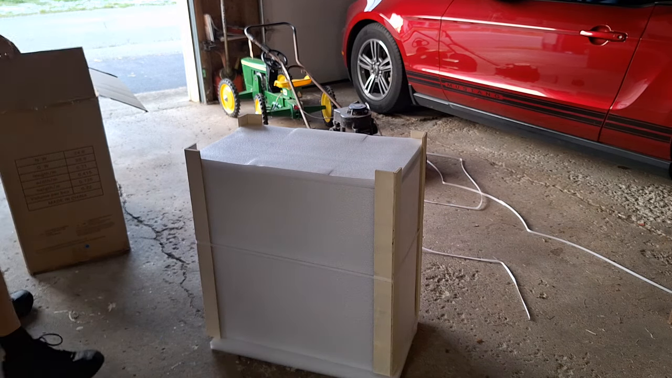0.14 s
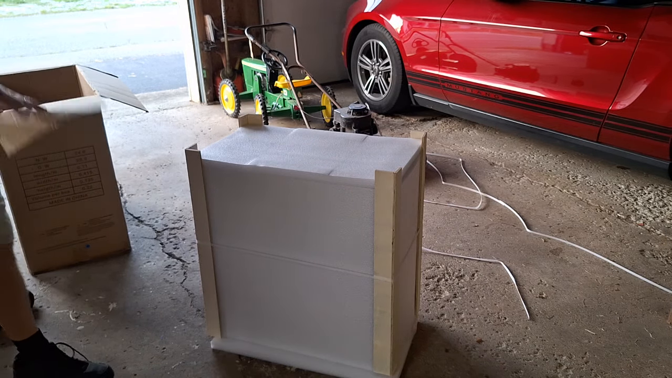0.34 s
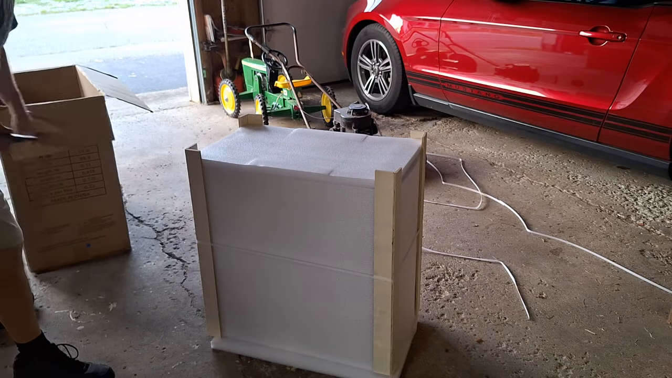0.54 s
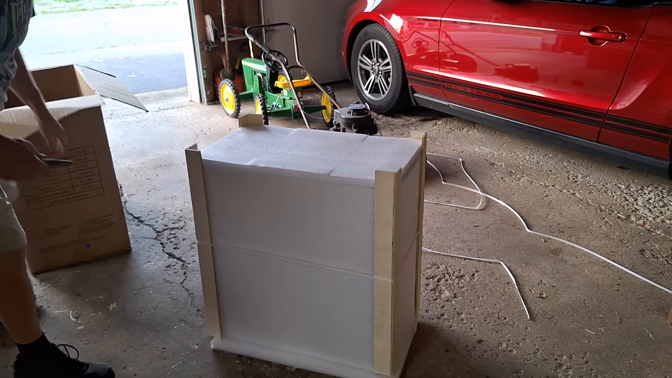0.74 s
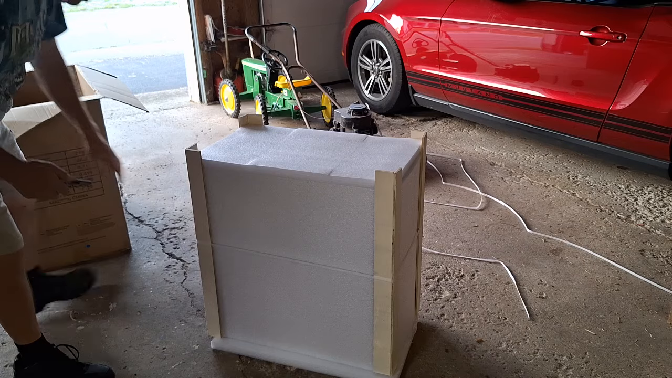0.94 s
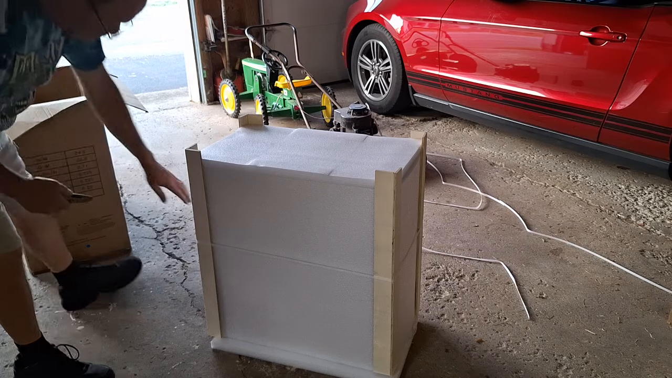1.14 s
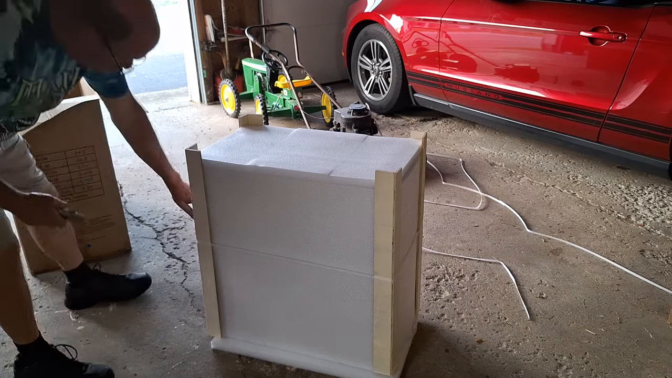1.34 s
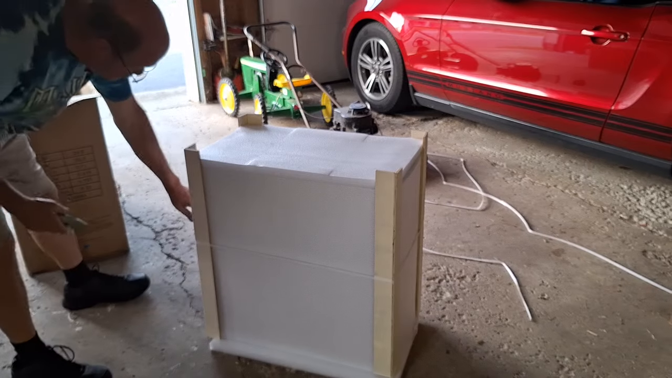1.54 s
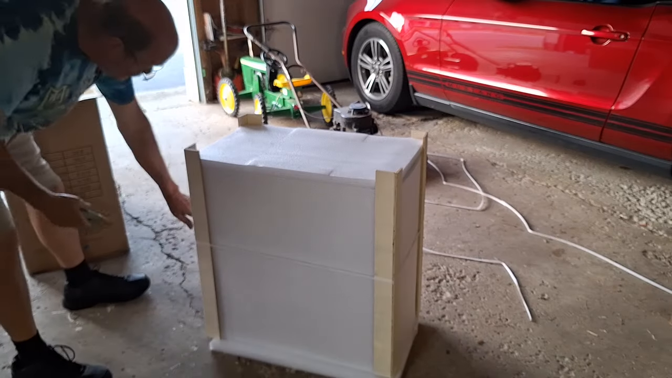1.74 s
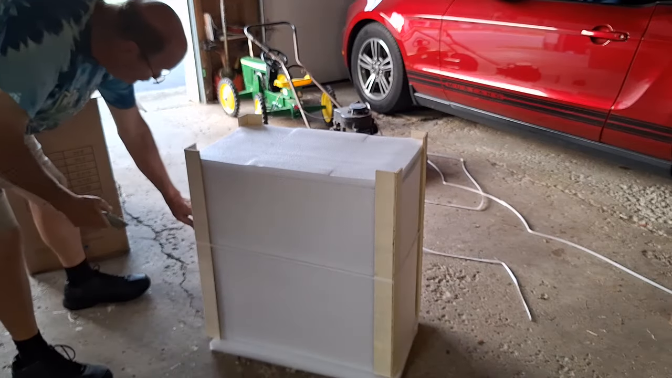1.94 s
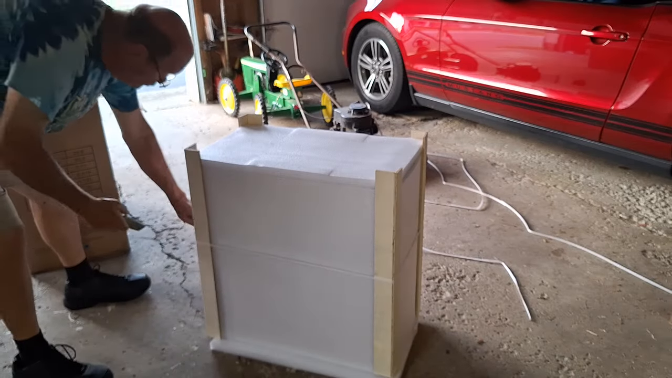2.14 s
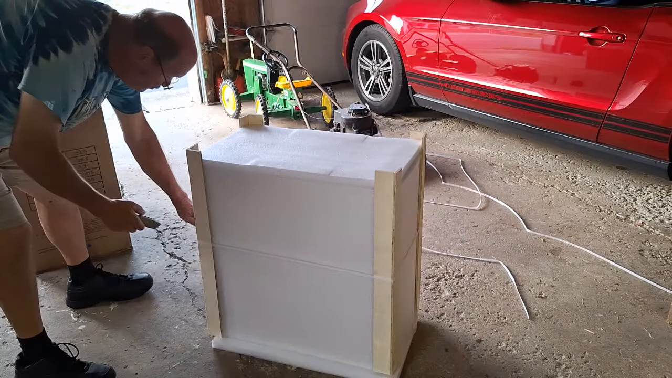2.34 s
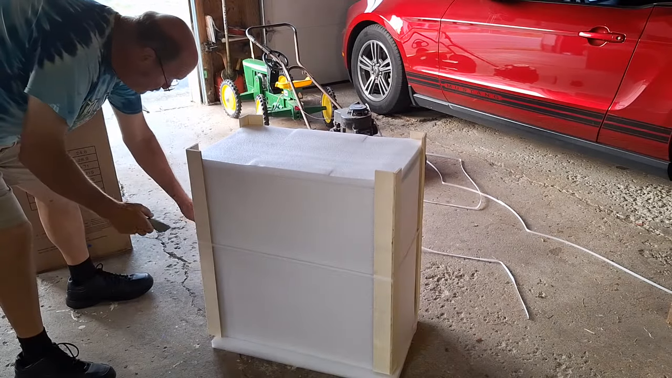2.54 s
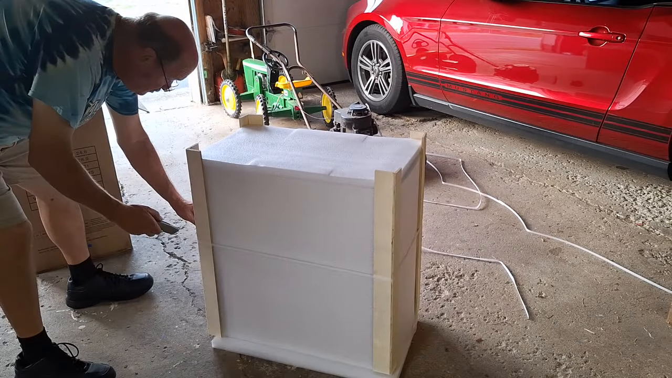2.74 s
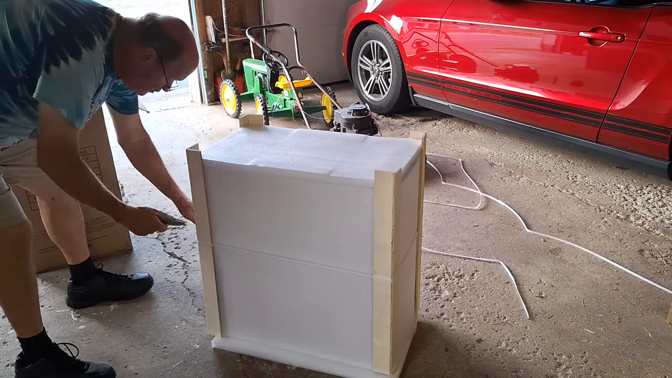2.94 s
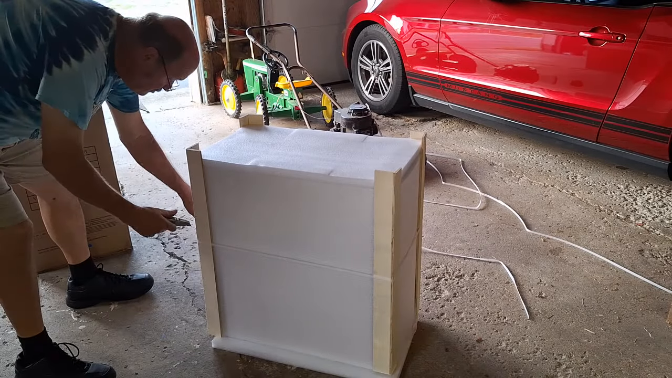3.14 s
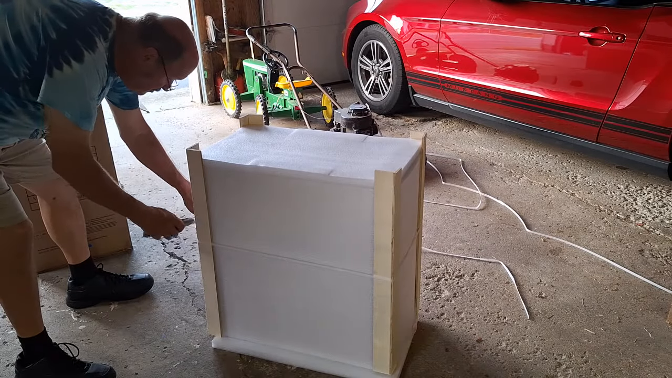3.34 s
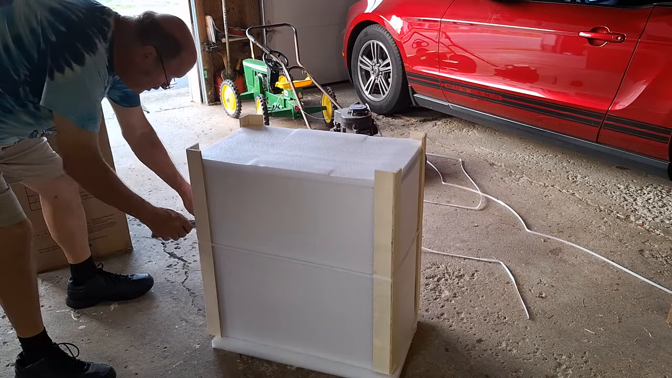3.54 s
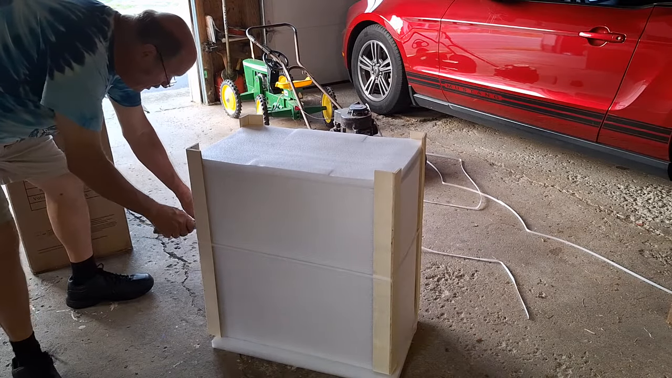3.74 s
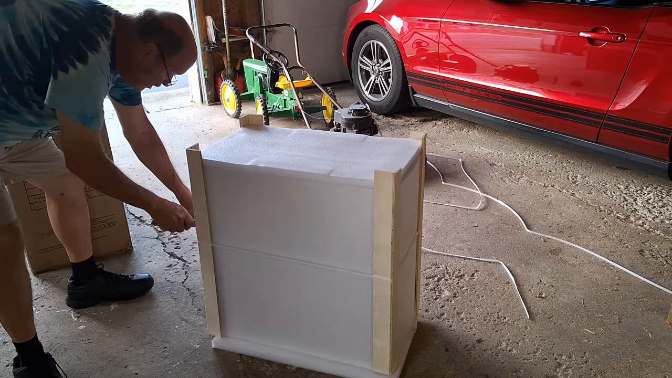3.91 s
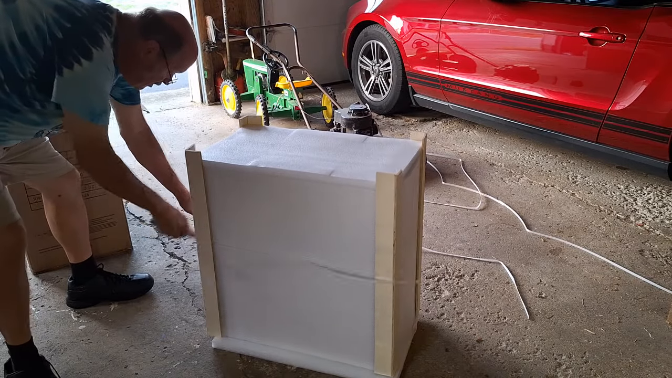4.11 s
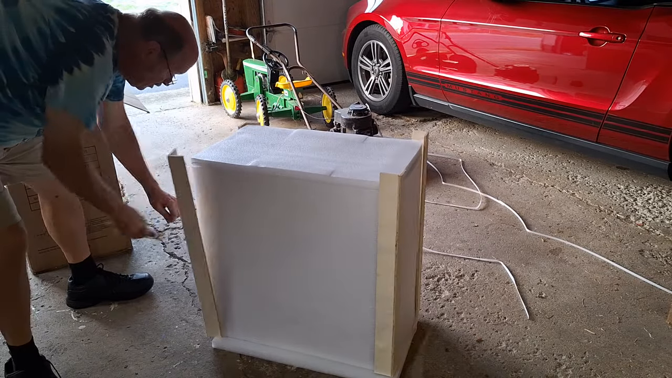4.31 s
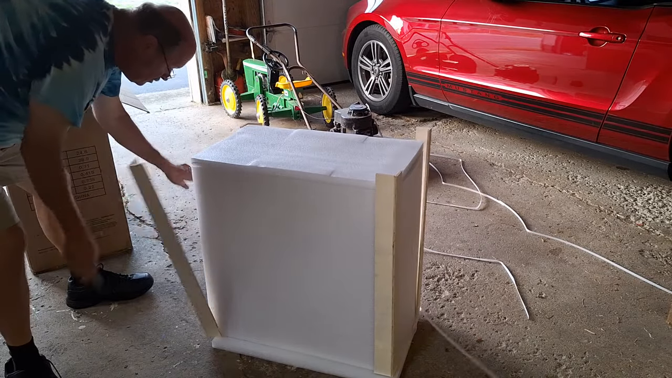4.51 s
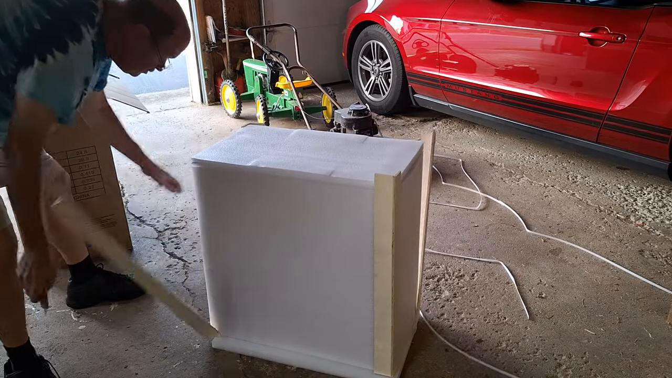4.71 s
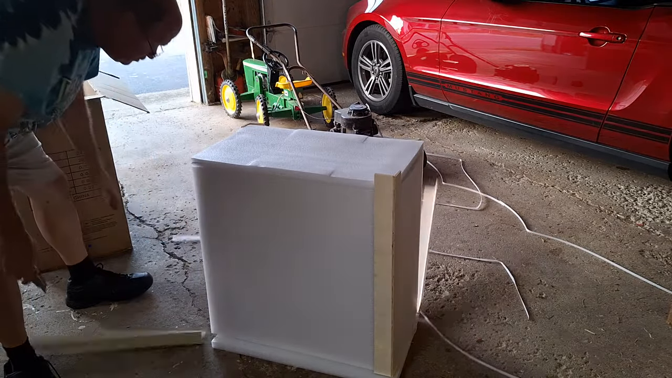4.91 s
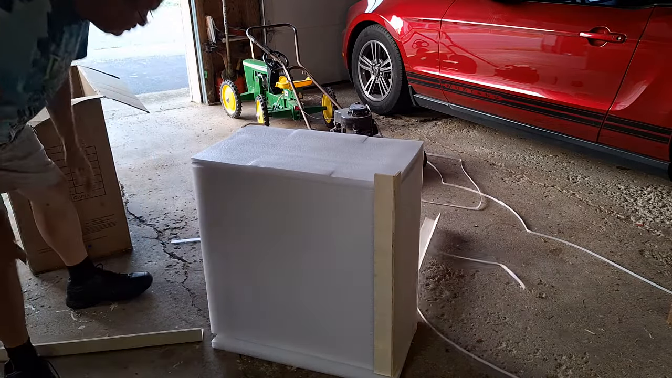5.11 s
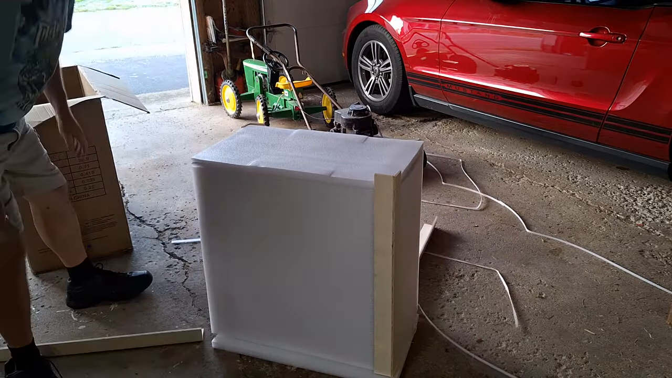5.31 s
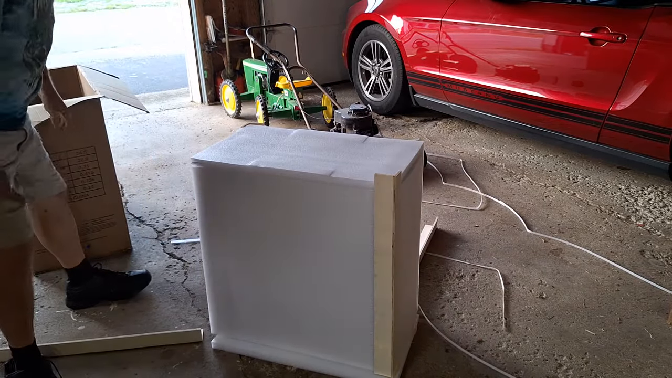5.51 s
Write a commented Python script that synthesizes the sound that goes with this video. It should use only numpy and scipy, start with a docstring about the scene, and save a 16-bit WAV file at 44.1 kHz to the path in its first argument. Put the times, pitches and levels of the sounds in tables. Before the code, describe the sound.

An empty cardboard box is bumped and shoved aside with soft scuffs and a hollow knock. Small ticks and light handling follow while a bird chirps faintly outside. A strap is plucked and briefly squeaks under a blade, then snaps with a thud against a foam-covered chest. A loose board clacks, tips and slaps the concrete hard. Stereo microphone nearby in an open garage, with short bright echo, street air and insects.

```python
"""Open concrete garage: a cardboard box is pushed aside, a packing strap is handled, cut and snaps off
a foam-clad chest, and a loose corner board knocks, tips over and slaps the floor. Contacts are noise
bursts through card resonances, rubbing is grainy filtered noise, and box, chest, board and strap ring
as decaying modes; the concrete answers with noise tails. Outside, wavering sines make a machine drone
and a far engine, filtered noise makes air and an insect chorus, and gliding tones make a far bird."""
import sys
import numpy as np
from scipy import signal
from scipy.fft import rfft, irfft, next_fast_len
from scipy.io import wavfile
from scipy.ndimage import map_coordinates

SR = 44100
rng = np.random.default_rng(int(sys.argv[2]) if len(sys.argv) > 2 else 0)


def nominal_scale(level):
    """Amplitude ratio for a level in decibels (scalar or array-like)."""
    x = np.asarray(level, float) / 20
    return 10 ** x


def put_to_file(sound):
    """Save the sound as 16-bit audio at rate SR, in the file named by the first command-line argument."""
    columns = np.atleast_2d(sound).T  # one column per channel
    safe = np.clip(columns, -1, 1)
    whole_steps = np.round(safe * 32767)
    wavfile.write(sys.argv[1], SR, whole_steps.astype(np.int16))


N = 245317


def unit(x):
    """Scale to rms 1."""
    return x / np.sqrt(np.mean(x ** 2) + 1e-20)


def along(points, hz):
    """Read a curve of (frequency [Hz], value) points on a log frequency axis."""
    f, v = np.transpose(points)
    return np.interp(np.log(hz + 1), np.log(f + 1), v)


def wobble(rate):
    """A smooth random curve, rate knots a second."""
    knots = rng.standard_normal(int(N * rate / SR) + 4)
    return map_coordinates(knots, [np.arange(N) * rate / SR])


def filtered(x, response):
    """x times a complex response of frequency, scaled so that white noise keeps its rms."""
    m = next_fast_len(N + SR // 2)
    h = response(np.fft.rfftfreq(m, 1 / SR))
    h = h / np.sqrt(np.mean(abs(h) ** 2))
    return irfft(rfft(x, m) * h, m)[..., :N]


def paired(a, b):
    """Mix two unrelated signals to left and right so that their likeness depends on frequency."""
    # left-right likeness, 1 = identical: (frequency [Hz], correlation)
    likeness = [(60, 0.54), (180, 1), (550, 0.49), (1500, 0.017), (16000, 0.049)]
    hz = np.fft.rfftfreq(len(a), 1 / SR)
    angle = np.arccos(np.clip(along(likeness, hz), -1, 1)) / 2
    mid = irfft(rfft(a) * np.cos(angle), len(a))
    side = irfft(rfft(b) * np.sin(angle), len(a))
    return np.array([mid + side, mid - side])


def card(f, centre_hz, spread):
    """Cardboard resonances over a plain knock, weighted by a squared band-pass hump around the blow."""
    # cardboard resonances: (centre [Hz], width [Hz], level [dB])
    resonances = [(400, 122, 5), (573, 260, -2.5), (776, 90, 1.5), (920, 28, -2), (1100, 330, -8),
                  (1296, 31, -3.5), (1590, 1170, -2), (2350, 140, -5.5), (3300, 2800, -5)]
    modes = sum(nominal_scale(db) * 1j * f * w / (c * c - f * f + 1j * f * w) for c, w, db in resonances)
    damping = 1j * f * spread * centre_hz
    hump = damping / (centre_hz ** 2 - f * f + damping)
    return (0.49 + modes) * hump ** 2


def bursts(length, size=2048):
    """Two dying noise bursts behind a sharp edge, evened out so that no frequency stands out by chance."""
    decay_s = max(length, .0005)
    fade = np.exp(-np.arange(size) / SR / decay_s)
    x = fade * rng.standard_normal((2, size))
    x[:, 0] = -1.1
    for _ in range(4):
        # flatten the spectrum, then hold the waveform under the fade again
        x = irfft(np.exp(1j * np.angle(rfft(x))), size)
        ceiling = fade * 3 * x.std(axis=1, keepdims=True) * np.sqrt(size / SR / decay_s)
        x = x * np.minimum(1, ceiling / (abs(x) + 1e-12))
    # the energy of 6 ms at rms 1, whatever the length
    return x / np.linalg.norm(x, axis=1, keepdims=True) * np.sqrt(.006 * SR)


def rung(blows, modes, rise):
    """A body rings in decaying sine modes after each blow, mode levels varying a little by chance."""
    out, t = np.zeros(N + SR), np.arange(SR // 2) / SR
    for s, blow_db in blows:
        ring = 0
        for hz, db, t60 in modes:
            ring = ring + nominal_scale(db + rng.normal(0, 1) - 60 * t / t60) * np.sin(2 * np.pi * hz * t)
        onset = 1 - np.exp(-t / rise)
        out[round(s * SR):][:len(t)] -= nominal_scale(blow_db) * ring * onset
    return out[:N]


def tone(notes, glide_s, edge_s, fade_db, overtone_db, rough):
    """Slightly unsteady notes with their octave, each settling from its first pitch towards its last."""
    out = np.zeros(N)
    for s, length, first_hz, last_hz, db in notes:
        t = np.arange(round((length + edge_s) * SR)) / SR
        hz = last_hz + (first_hz - last_hz) * np.exp(-t / glide_s)
        unsteady_hz = hz * (1 + rough * wobble(86)[:len(t)])
        phase = 2 * np.pi * np.cumsum(unsteady_hz) / SR
        edges = np.clip(np.minimum(t, t[-1] - t) / edge_s, 0, 1) ** 2
        wave = np.sin(phase) + nominal_scale(overtone_db) * np.sin(2 * phase)
        out[round(s * SR):][:len(t)] += np.sqrt(2) * edges * nominal_scale(db - fade_db * t / length) * wave
    return out


def hits():
    """Each contact sends one noise burst through a bright tick colour and one through the card."""
    # contacts: (time [s], bright tick [dB], knock [dB], knock centre [Hz], contact length [s])
    contacts = [(0.187, -35, -36.5, 1010, 0.0074), (0.441, -45.5, -42, 1500, 0.0017),
                (0.509, -35, -28.5, 630, 0.0022), (0.802, -36, -53, 700, 0.0054),
                (0.841, -59, -38.5, 610, 0.0041), (1.021, -52, -51, 533, 0.0043),
                (1.224, -53.5, -47, 400, 0.005), (1.367, -49, -43, 565, 0.013),
                (1.515, -57, -44, 510, 0.0092), (1.838, -50.5, -45.5, 550, 0.012),
                (2.071, -51, -46.5, 500, 0.0059), (2.162, -54, -45, 640, 0.0021),
                (2.215, -41.5, -38.5, 1210, 0.003), (2.247, -38, -33, 920, 0.0046),
                (2.431, -36.5, -35.5, 760, 0.0087), (2.569, -50, -67, 1560, 0.0055),
                (2.822, -35.5, -55, 2680, 0.0084), (4.02, -56, -57, 580, 0.0033),
                (4.127, -31.5, -39, 1200, 0.042), (4.159, -19, -16.5, 1100, 0.0041),
                (4.275, -38, -18, 2160, 0.006), (4.333, -44, -27, 1000, 0.0044),
                (4.367, -52, -22.5, 1920, 0.0044), (4.423, -66, -30, 1190, 0.0042),
                (4.5015, -23.5, -33, 1980, 0.0024), (4.51, -30, -42, 2000, 0.004),
                (4.649, -42, -51, 1350, 0.0037), (4.729, -36.5, -51, 1515, 0.0036),
                (4.89, -34.5, -40.5, 2470, 0.0019), (4.901, -45, -64, 2500, 0.0061),
                (5.0182, -8, -1.5, 1570, 0.0081), (5.047, -22, 6, 2280, 0.024),
                (5.063, -7.5, -7.5, 1404, 0.0059), (5.081, -2, 8, 1730, 0.013),
                (5.235, -37, -8, 1350, 0.0013), (5.265, -27, -16, 1780, 0.0033),
                (5.272, -28, -13.5, 1500, 0.0031), (5.383, -34, -15, 1760, 0.00096)]
    # tick colour: (frequency [Hz], relative density [dB per Hz])
    tick_colour = [(1470, -34), (2500, -20.5), (3270, -4.5), (5090, -6.5), (5820, -7.5), (15000, -8.5),
                   (16100, -23), (16500, -52)]
    breadth = 1.95  # width of the hump, before squaring, as a share of its centre
    tick, knock, n = np.zeros(N + SR), np.zeros(N + SR), SR // 4
    hz = np.fft.rfftfreq(n, 1 / SR)
    for s, tick_db, knock_db, centre_hz, length in contacts:
        at, burst = round(s * SR), bursts(length)
        colour = card(hz, centre_hz, breadth)
        colour = colour / np.sqrt(np.mean(abs(colour) ** 2))
        tick[at:][:burst.shape[1]] += nominal_scale(tick_db) * burst[0]
        knock[at:][:n] += nominal_scale(knock_db) * irfft(rfft(burst[1], n) * colour, n)
    return filtered(tick[:N], lambda f: nominal_scale(along(tick_colour, f))) + knock[:N]


def chest_thuds():
    """Blows on the foam-clad side of the chest set off its low, short modes."""
    # blows: (time [s], level [dB])
    thumps = [(1.37, -44.5), (2.248, -39), (4.1605, -7), (4.272, -55), (5.018, -29), (5.384, -29)]
    # modes of the foam-clad side: (frequency [Hz], level [dB], t60 [s])
    panel = [(135, 0, .24), (164, -6, .24), (195, -11, .16), (225, -15, .1), (307, -18, .05),
             (62, -17, .12)]
    return rung(thumps, panel, rise=0.001)


def box_bumps():
    """An empty box bumps or shakes and booms in its hollow modes."""
    # bumps: (time [s], level [dB])
    bumps = [(.185, -44), (.508, -29.5), (.56, -61), (.85, -45.5), (1.519, -52.5), (2.426, -55),
             (5.019, -25.5)]
    # box modes: (frequency [Hz], level [dB], t60 [s])
    box = [(159.7, -3.5, 0.22), (200, 2, 0.18), (252, 1.5, 0.11), (329.6, -6, 0.26), (400, -15, 0.095),
           (520, -7, 0.2), (700, -13.5, 0.23), (825, -3.5, 0.11)]
    return rung(bumps, box, rise=0.0024)


def board_clacks():
    """Stiff folded card, a box edge and then the loose corner board, rings almost at once when struck."""
    # clacks: (time [s], level [dB])
    clacks = [(.188, -33), (.2, -39), (.222, -41.5), (4.159, -22), (4.272, -12.5), (4.295, -19.5),
              (4.367, -16.5), (4.42, -54), (5.06, -6.5), (5.236, -36)]
    # folded card modes: (frequency [Hz], level [dB], t60 [s])
    board = [(745, -5, .1), (790, -8, .08), (905, -5, .09), (1110, -6, .07), (1285, -5, .09),
             (1500, -8, .07)]
    return rung(clacks, board, rise=0.00011)


def strap_twangs():
    """The taut strap is plucked and its modes swell over a few milliseconds, then die."""
    # plucks: (time [s], level [dB])
    plucks = [(.755, -41), (2.166, -38), (2.215, -44), (3.69, -28.5), (3.72, -53), (3.742, -27.5),
              (3.8, -34), (4.131, -27.5)]
    # strap modes: (frequency [Hz], level [dB], t60 [s])
    strap = [(613, -10, 0.27), (643, 7, 0.05), (1019, -14.5, 0.09)]
    return rung(plucks, strap, rise=0.0056)


def blade_squeak():
    """The blade squeaks on the strap: a rough tone with a strong octave, its pitch sagging."""
    # squeak: (start [s], length [s], first pitch [Hz], pitch it heads for [Hz], level [dB])
    squeak = [(3.643, .075, 1130, 900, -43)]
    return tone(squeak, glide_s=.08, edge_s=0.02, fade_db=1.0, overtone_db=-3.5, rough=0.029)


def rubbing():
    """Dense uneven grains of friction heard as hiss, scrape and hollow body; strokes rise, hold and fade."""
    # strokes of hands, shoes and card:
    # (start [s], length before the fade [s], hiss [dB], scrape [dB], hollow body [dB])
    strokes = [(.01, 0.1, -53, -61, -69), (0.091, 0.035, -41, -47.5, -54), (0.185, 0.035, -54, -78, -43),
               (0.255, 0.17, -55, -72, -71), (0.462, 0.062, -43.5, -48, -48),
               (0.59, 0.15, -53.5, -59, -52.5), (0.715, 0.09, -52, -63, -50.5),
               (0.811, 0.052, -56, -61, -47), (1.372, 0.025, -59, -57, -70), (1.508, 0.023, -61, -61, -53),
               (2.17, 0.045, -61, -56, -59), (2.23, 0.045, -73, -52, -50.5),
               (2.403, 0.021, -51.5, -44.5, -66), (3.668, 0.061, -48.5, -43, -42),
               (3.737, 0.046, -50, -42, -50), (4.136, 0.047, -29, -52, -38), (4.28, 0.04, -57, -38, -31.5),
               (4.4, 0.057, -61, -43, -38), (4.57, 0.14, -53.5, -55.5, -81),
               (4.706, 0.072, -51.5, -49.5, -60), (4.904, 0.104, -53, -54.5, -59),
               (5.244, 0.073, -31, -27.5, -51), (5.384, 0.039, -52, -34, -38)]
    # hiss colour: (frequency [Hz], relative density [dB per Hz])
    hiss_colour = [(1180, -2), (2000, -41), (3140, -6), (3740, -3), (4020, -4.5), (15100, -1), (16100, 4.5),
                   (16500, -50)]
    rise_s, fade_db_per_s = 0.025, 263
    unevenness_db = 4 * np.tanh(wobble(300)) + 3 * np.tanh(wobble(40))
    grains = rng.standard_normal((3, N)) * nominal_scale(unevenness_db)
    hiss = unit(filtered(grains[0], lambda f: nominal_scale(along(hiss_colour, f))))
    scrape = unit(filtered(grains[1], lambda f: card(f, 1500, spread=2.5)))
    body = unit(filtered(grains[2], lambda f: card(f, 577, spread=0.99)))
    t, gains = np.arange(N) / SR, 0
    for s, length, *layers_db in strokes:
        rise = np.clip((t - s) / rise_s, 0, 1)
        fade = nominal_scale(-fade_db_per_s * np.maximum(t - s - length, 0))
        gains = gains + np.outer(nominal_scale(layers_db), rise * fade)
    return np.sum(gains * [hiss, scrape, body], axis=0)


def garage(x, build=0.0011, bend=1.017):
    """Concrete walls answer with noise that builds up fast, then dies at a speed set by frequency."""
    # reverberation: (frequency [Hz], t60 [s])
    decay = [(100, 0.74), (500, 0.34), (1500, 0.46), (4000, 0.42), (10000, 0.34), (16000, 0.26)]
    # a fresh tail for every quarter second of sound
    out, step, n = np.zeros((2, N + 2 * SR)), SR // 4, SR * 3 // 4
    onset = 1 - np.exp(-np.arange(n) / SR / build)
    for a in range(0, N, step):
        hz, t, z = signal.stft(rng.standard_normal((2, n)), SR, nperseg=256)
        # bend above 1 holds the level a moment before it falls
        fade_db = -60 * (t / along(decay, hz)[:, None]) ** bend
        tail = signal.istft(z * nominal_scale(fade_db), SR, nperseg=256)[1][:, :n]
        tail = paired(*(tail * onset))
        wet = signal.fftconvolve(x[None, a:a + step], tail / np.linalg.norm(tail[0]), axes=1)
        out[:, a:a + wet.shape[1]] += wet
    return out[:, :N]


def far_bird():
    """Bird notes: nearly pure tones, each gliding quickly onto its last pitch."""
    # notes: (start [s], length [s], first pitch [Hz], last pitch [Hz], relative level [dB])
    notes = [(1.72, .04, 2350, 2240, -63), (1.78, .07, 2300, 2570, -56), (1.865, 0.05, 2950, 2370, -55.5),
             (2.31, 0.091, 2300, 2250, -58), (2.405, 0.024, 2620, 2420, -50),
             (2.835, .07, 3300, 2240, -51.5), (2.92, .09, 2380, 2300, -55.5),
             (3.015, 0.072, 3100, 2256, -53)]
    return tone(notes, glide_s=.022, edge_s=.008, fade_db=7, overtone_db=-40, rough=.02)


def insects():
    """The steady chorus is a broad noise band near 4.9 kHz; one small insect ticks high up, 62 times a second."""
    # steady chorus, level raised late to offset the gain control's ducking:
    # (time [s], level before the left-right offset [dB])
    chorus_level = [(0, -62.5), (4, -63.5), (5.56, -53.5)]
    t = np.arange(N) / SR
    chorus = filtered(rng.standard_normal((2, N)), lambda f: np.exp(-np.log((f + 1) / 4900) ** 2 / 0.19))
    times, levels_db = np.transpose(chorus_level)
    chorus = nominal_scale(np.interp(t, times, levels_db) + 0.27 * wobble(9.6)) * chorus
    ticks = filtered(rng.standard_normal((2, N)), lambda f: np.exp(-((f - 12900) / 160) ** 2))
    ticks = ticks * np.sin(np.pi * 62 * t) ** 4
    return chorus * nominal_scale([[1.6], [-1.6]]) + nominal_scale(-82) * ticks


def machines():
    """Low machine tones waver in level and phase; a far engine pulls away on a rising, swelling tone."""
    # machine tones: (frequency [Hz], level before the left-right offset [dB])
    partials = [(46, -51.5), (58, -50), (100, -60.5), (358, -73), (572, -75.5), (1440, -83)]
    # engine: (start [s], length [s], first pitch [Hz], pitch it heads for [Hz], level at the start [dB])
    engine = [(4.42, 0.72, 86.1, 98.4, -49)]
    t, low = np.arange(N) / SR, 0
    for hz, db in partials:
        level = nominal_scale(db + 1.5 * wobble(4))
        drift = (.6 + hz / 400) * wobble(5)  # radians
        low = low + np.sqrt(2) * level * np.sin(2 * np.pi * hz * t + drift)
    low = low + tone(engine, glide_s=.4, edge_s=.05, fade_db=-3.0, overtone_db=-25, rough=0.0081)
    return low * nominal_scale([[1.9], [-1.9]])


def street_air():
    """Street air is bass-heavy stereo noise whose level swells slowly."""
    # air colour: (frequency [Hz], relative density [dB per Hz])
    air_colour = [(21, -46), (35, -8.5), (72, -0.5), (168, -14), (365, -17), (415, -25), (565, -22),
                  (1470, -34.5), (1670, -38.5), (2790, -37.5), (3520, -32), (5180, -29), (9360, -67),
                  (15300, -102), (16500, -88)]
    # colour tilt between the ears: (frequency [Hz], relative left minus right [dB])
    tilt = [(60, 5), (240, 4), (950, 6.5), (3770, 8), (15000, 5.5)]
    air_db, swell_db = -52, 2.2
    noise = filtered(rng.standard_normal((2, N)), lambda f: nominal_scale(along(air_colour, f)))
    left, right = paired(*noise)
    left = filtered(left, lambda f: nominal_scale(along(tilt, f) / 2))
    right = filtered(right, lambda f: nominal_scale(-along(tilt, f) / 2))
    air = unit(np.array([left, right]))
    return nominal_scale(air_db + swell_db * wobble(2.345)) * air * nominal_scale([[1.5], [-1.5]])


def scene():
    """Near sounds reach the left port a few samples early; the far bird is mostly echo."""
    # balance of near sounds and echo: (frequency [Hz], relative left minus right [dB])
    sideways = [(60, -2.5), (240, 3), (950, 0), (3770, 2.5), (15000, -2.5)]
    thud = chest_thuds() + box_bumps()
    near = hits() + board_clacks() + strap_twangs() + rubbing() + blade_squeak()
    bird = far_bird()
    late = np.pad(near, (7, 0))[:N]
    direct = np.array([near, late]) * nominal_scale(-7)
    room = direct + garage(nominal_scale(-3.0) * near + nominal_scale(-6.5) * thud + nominal_scale(-4.5) * bird)
    room = filtered(room, lambda f: nominal_scale(np.outer([1, -1], along(sideways, f)) / 2))
    outdoors = street_air() + machines() + insects()
    return room + thud * nominal_scale([[.7], [-.7]]) + nominal_scale(-10) * bird + outdoors


def top_cut(x):
    """Nothing passes above the cut-off."""
    return signal.sosfilt(signal.butter(12, 16810, fs=SR, output="sos"), x)


def record(dry):
    """Microphone hiss and bass cut; gain control, deaf to bass, ducks after loud sounds and creeps back."""
    x = dry + nominal_scale(-73) * rng.standard_normal(dry.shape)
    x = filtered(x, lambda f: (1j * f / (30 + 1j * f)) ** 3)
    heard = filtered(x, lambda f: 1j * f / (500 + 1j * f))
    memory = np.exp(-1 / (.5 * SR))  # half a second
    loudness = signal.lfilter([1 - memory], [1, -memory], np.mean(heard ** 2, axis=0))
    gain = (1 + loudness / nominal_scale(-64)) ** -.33  # loudness is mean square, so the knee is at rms -32 dB
    return top_cut(x * gain)


dry = scene()
out = record(dry)
put_to_file(out)
```